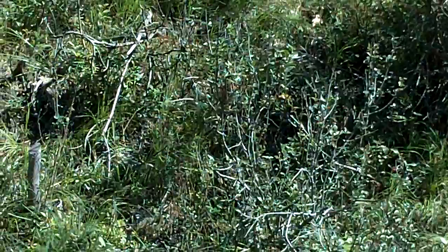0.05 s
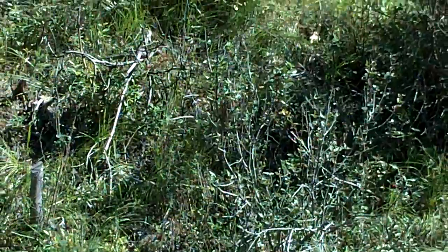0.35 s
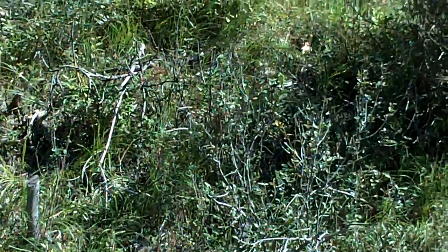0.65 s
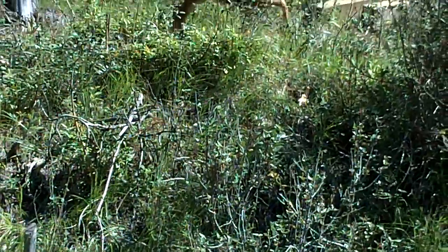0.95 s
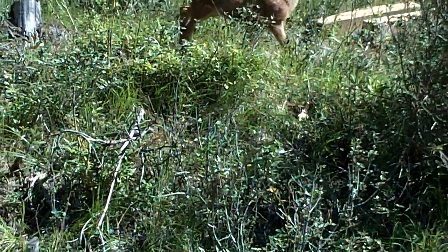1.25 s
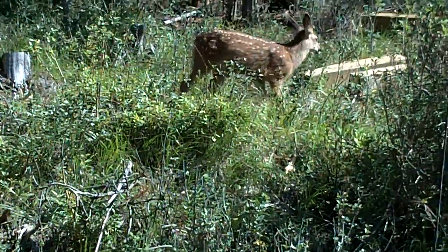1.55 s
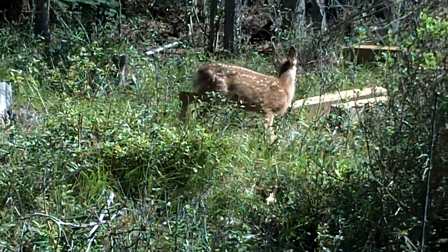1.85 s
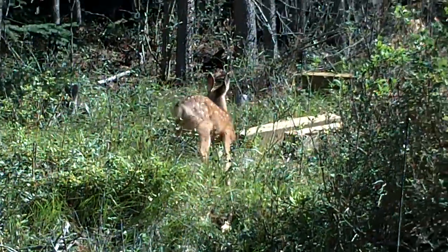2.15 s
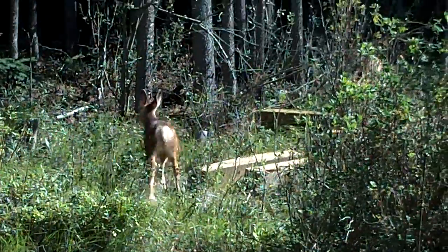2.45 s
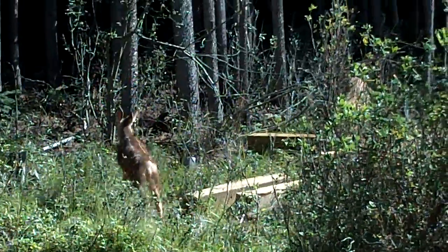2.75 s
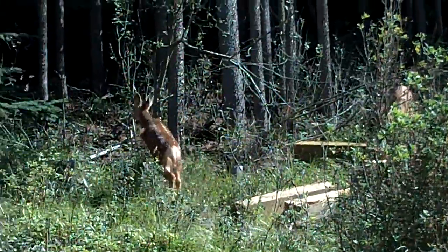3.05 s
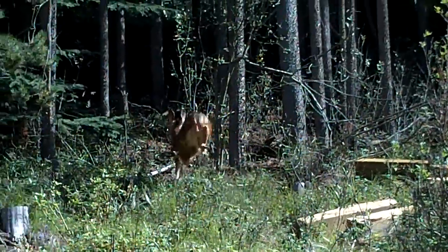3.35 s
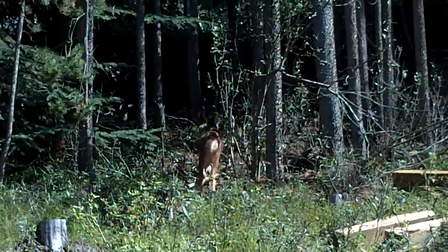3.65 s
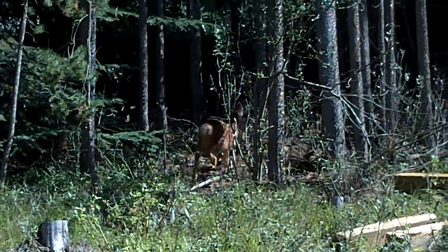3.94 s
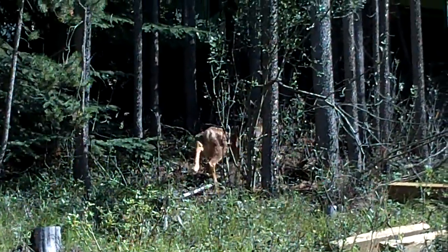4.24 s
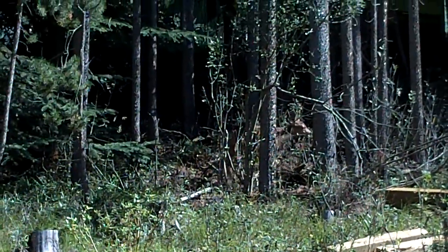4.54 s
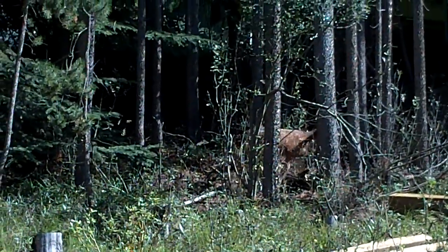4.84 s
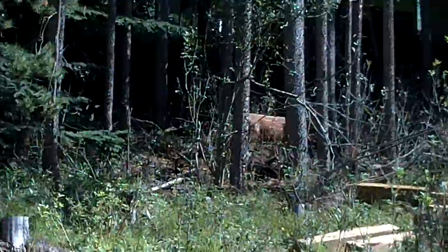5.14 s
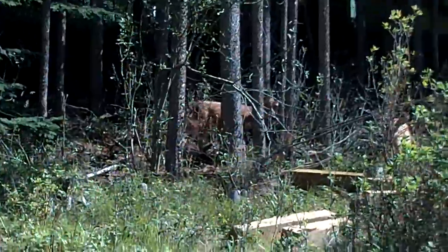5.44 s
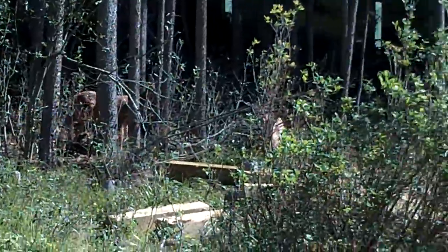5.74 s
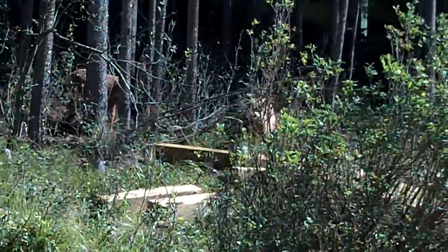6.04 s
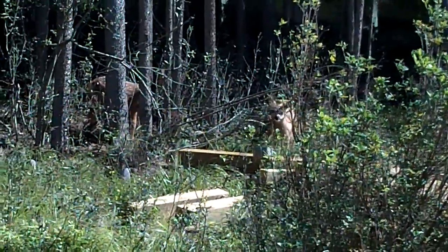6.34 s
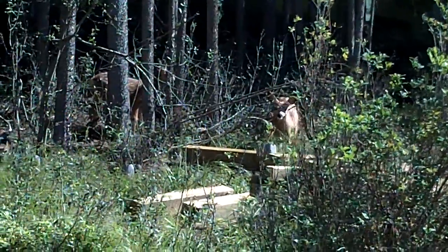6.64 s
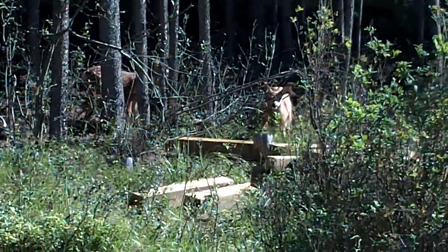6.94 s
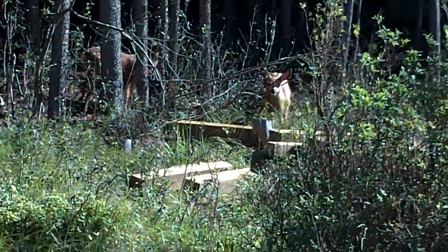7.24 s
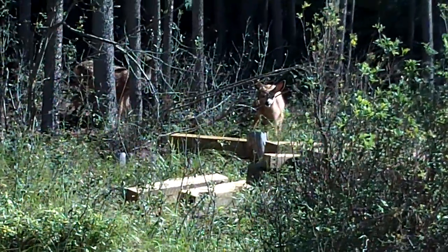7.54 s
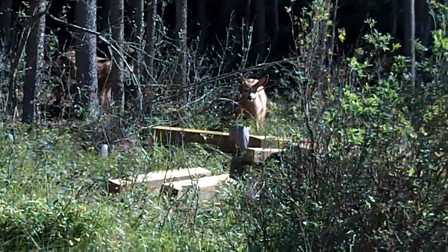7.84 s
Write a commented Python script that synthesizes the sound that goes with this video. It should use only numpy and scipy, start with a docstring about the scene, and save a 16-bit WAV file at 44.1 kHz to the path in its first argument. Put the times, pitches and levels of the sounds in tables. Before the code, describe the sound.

Lumpy wind rumble thumps on the microphone, then eases, with soft forest rustle, a snapping twig and light camera clicks.

```python
"""You hear a low, lumpy rumble of wind on a hand-held camera at a grassy forest edge.
Gusts shed eddies (small swirls of air) at the microphone's opening, and these make the rumble.
Behind it, treetops roar softly, grass and needles hiss, leaves flutter and a far motor hums faintly.
Two twigs snap and the camera body clicks three times under the hand; each rings very briefly."""
import sys
import numpy as np
from scipy import signal
from scipy.fft import rfft, irfft, next_fast_len
from scipy.io import wavfile
from scipy.ndimage import uniform_filter1d

SR = 44100
rng = np.random.default_rng(int(sys.argv[2]) if len(sys.argv) > 2 else 0)


def to_wav(s):
    """Save 16-bit WAV."""
    ch = np.atleast_2d(s).T  # columns
    pcm = np.round(np.clip(ch, -1, 1) * 32767)  # PCM
    wavfile.write(sys.argv[1], SR, pcm.astype(np.int16))


N = 352359
TIME = np.arange(N) / SR

# Gusts, each a flurry of small eddies around a large one: time_s, flurry_db, rise_and_fall_s, thump_db
GUST_EVENTS = [(0.105, -25.5, 0.052, -13.5), (0.438, -18.5, .012, -13), (0.576, -7.5, .012, -17),
               (0.708, -19.5, 0.023, -24), (0.747, -21.5, 0.0081, -15), (0.933, -22, 0.013, -15.5),
               (1.372, -30, 0.071, -15.5), (1.633, -20, 0.013, -12), (1.663, -30, 0.014, -10),
               (1.831, -20, 0.029, -11), (1.994, -22.5, 0.053, -14.5), (2.362, -26, 0.0092, -13),
               (2.494, -14.5, 0.017, -9), (2.629, -12, 0.007, -6.5), (2.706, -13, .02, -7),
               (2.779, -17.5, 0.017, -15.5), (2.854, -25, 0.016, -11.5), (2.938, -18.5, 0.033, -14),
               (3.017, -20, 0.0079, -12.5), (3.087, -20, 0.016, -13.5), (3.341, -22.5, 0.035, -14),
               (3.401, -24, 0.023, -27), (5.516, -25.5, .012, -17.5), (5.639, -30, 0.034, -14.5),
               (6.083, -33, 0.032, -17), (6.28, -29.5, 0.044, -18), (6.447, -31, 0.063, -19.5),
               (7.228, -24, 0.014, -23.5), (7.684, -29, 0.018, -21)]
# Strength of the wind between gusts: time_s, level_db
WIND_STRENGTH = [(0.28, -42), (0.43, -32), (0.6, -32.5), (1.2, -34.5), (1.82, -26), (2.06, -44.5),
                 (2.25, -33.5), (2.68, -26.5), (2.87, -24.5), (3.09, -37), (5.06, -46.5), (6.33, -38.5),
                 (6.67, -46.5), (7.51, -42), (7.98, -38.5)]
# Slow swell of wind pressure on the microphone: time_s, level_db
PRESSURE_SWELL = [(0.08, -28.5), (0.5, -31), (0.87, -23.5), (1.07, -30.5), (2.83, -27), (3.2, -33),
                  (5.05, -37), (5.32, -44.5), (5.6, -23), (5.71, -34), (6.35, -33), (6.39, -41),
                  (6.46, -23), (6.55, -42), (7.21, -35), (7.45, -45.5), (7.85, -32.5), (7.98, -54)]
# Tone of the eddies in a medium gust: pitch_hz, level_db
EDDY_SPECTRUM = [(18, -16), (35, -16.5), (70, -15.5), (120, -17.5), (200, -24), (320, -34.5), (500, -48.5),
                 (800, -73.5), (1400, -87.5)]
# Breeze in the trees: time_s, treetop_roar_db, needle_hiss_db, leaf_flutter_db
BREEZE_LEVELS = [(0.35, -54.5, -61.5, -83), (1.06, -54, -61.5, -81.5), (2.45, -54, -59, -79),
                 (2.6, -53, -58.5, -77), (4.55, -53, -60, -80.5), (6.76, -51.5, -58.5, -77),
                 (7.29, -50.5, -57, -72), (7.9, -50, -58, -73)]
# Tone of the treetops' roar: pitch_hz, level_db
TREETOP_SPECTRUM = [(40, -14.5), (150, 6), (330, 2), (520, -0.5), (720, -5), (1050, -6), (1600, -10.5),
                    (2200, -13.5), (3200, -18.5), (6000, -54.5)]
# Tone of the hiss of grass and needles: pitch_hz, level_db
NEEDLE_SPECTRUM = [(1200, -14), (2400, -12.5), (3000, 0.5), (4200, 5), (4900, 3), (5400, -12.5), (6000, -9),
                   (7200, -16.5), (8500, -19), (10300, -20), (12000, -48)]
# Tone of the fluttering leaves: pitch_hz, level_db
LEAF_SPECTRUM = [(4500, -6.5), (6000, 5.5), (7000, 4.5), (8400, 0), (9700, 3), (10600, 2), (11600, -6),
                 (13500, -17), (16000, -26)]
# Twigs breaking: start_s, level_db, favoured_pitch_hz, falloff_db_per_octave
TWIG_SNAPS = [(1.8061, -21, 4600, 8), (3.9785, -32, 4470, 22)]
# Notes a twig rings at: pitch_hz, level_db, ring_s
TWIG_NOTES = [(1100, -25, 0.0012), (1970, -35, 0.0024), (3400, 5, 0.0062), (4380, 2, 0.0042),
              (4630, 5, 0.0064), (6760, -37, 0.0019), (8600, -23, 0.0018), (11800, -28, .0015)]
# Hand taps on the camera: start_s, level_db, favoured_pitch_hz, falloff_db_per_octave, hardness_db
HAND_TAPS = [(5.9619, -22.5, 1485, 36, -1.5), (6.0475, -24.5, 970, 5, -11), (6.1024, -25, 935, 5, -18)]
# Low notes of the camera's shell: pitch_hz, level_db, ring_s
SHELL_NOTES = [(560, -3, 0.02), (932, -3.5, 0.027), (1460, 8.5, 0.006), (1660, 9, 0.0048),
               (1980, -0.5, 0.012)]
# High notes in the thin tick of a hard contact: pitch_hz, level_db, ring_s
TICK_NOTES = [(4740, -17, 0.016), (6230, -14, 0.0034), (9400, -17, 0.002), (13100, -26, .004)]
# The far motor's two tones: pitch_hz, level_db
MOTOR_TONES = [(263.3, -53), (437, -69.5)]
# How well the air carries the hum: time_s, gain_db
AIR_CARRY = [(0, 1), (3.3, -1.5), (3.9, 3), (4.6, 3), (5.2, -12.5), (5.9, 5.5), (6.9, -9.5), (7.4, 4),
             (7.95, 8)]
# Narrow bands that the camera picks up poorly: pitch_hz, width_hz
CAMERA_DIPS = [(2715, 730), (5500, 450), (7870, 1740), (10930, 930)]


def wind_on_microphone(rumble_dip=0.8, sizzle_db=-37):
    """The rumble dips briefly around each thump, so the thump stands clear; strong gusts sizzle faintly."""
    pressure, nearness = gust_thumps()
    rumble = eddy_rumble() * (1 - rumble_dip * nearness) + pressure
    power = uniform_filter1d(rumble ** 2, size=1500)
    return rumble + from_db(sizzle_db) * power * rng.standard_normal(N)


def eddy_rumble(medium_db=-29, brightening=0.65, max_excess_db=13.5, full_db=-15):
    """Harder gusts shed smaller eddies, so the rumble reaches higher even once its low end is full."""
    swell_db = in_time(PRESSURE_SWELL)[0] + 3.0 * drift(rate_hz=11) - 1.5
    gust_db = gust_strength()
    flurry_db = np.minimum(gust_db, full_db) - 3.5
    excess_db = np.minimum(gust_db - medium_db, max_excess_db)
    edges_hz = 18 * 2 ** np.arange(0, 6.6, 2 / 3)
    out = 0
    for low, high in zip(edges_hz, edges_hz[1:]):
        hz = np.sqrt(low * high)
        eddies = rms_one(band(rng.standard_normal(N + SR), low, high)[SR:])
        # even out the level: eddies follow one another closely, with few long gaps
        power = uniform_filter1d(eddies ** 2, size=4000) + 1e-6
        eddies = rms_one(eddies / power ** 0.25)
        # low bands follow the slow swell, higher ones follow the gusts
        gust_share = np.clip(np.log2(hz / 70), 0, 1)
        level_db = (1 - gust_share) * swell_db + gust_share * flurry_db
        octaves_up = max(np.log2(hz / 150), 0)
        level_db += brightening * octaves_up * excess_db + at_hz(EDDY_SPECTRUM, hz)
        out = out + eddies * np.sqrt(high - low) * from_db(level_db)
    return out


def gust_strength(calm_db=-2.5, wind_lumps_db=4.0, gust_lumps_db=2.74):
    """Buffeting in dB: gusts swell out of the lumpy wind and die back; calm air sheds fewer eddies."""
    wind_db, = in_time(WIND_STRENGTH)
    calm = (wind_db.max() - wind_db) / np.ptp(wind_db)
    lumps = drift(rate_hz=22)
    between_gusts = from_db(wind_db + calm_db * calm ** 2 + wind_lumps_db * lumps)
    gust_power = sum((from_db(db) * np.exp(-np.minimum(np.abs(TIME - time_s) / fade_s, 20))) ** 2
                     for time_s, db, fade_s, _ in GUST_EVENTS)
    return 10 * np.log10(between_gusts ** 2 + gust_power * from_db(gust_lumps_db * lumps) ** 2)


def gust_thumps(medium_hz=117, medium_db=-23.5, octaves_per_db=0.0438):
    """A large eddy passes as a push between two weaker pulls, higher in pitch in a stronger gust."""
    pressure, nearness = np.zeros(N), np.zeros(N)
    for time_s, flurry_db, _, thump_db in GUST_EVENTS:
        hz = medium_hz * 2 ** (octaves_per_db * (flurry_db - medium_db))
        span = np.abs(TIME - time_s) < .04
        spread = (np.pi * hz * (TIME[span] - time_s)) ** 2
        pressure[span] += from_db(thump_db) * (1 - 2 * spread) * np.exp(-spread)
        nearness[span] += np.exp(-spread / 10)  # how near each thump is in time
    return pressure, np.clip(nearness, 0, 1)


def trees(flutter_db=4.0, flutter_hz=24):
    """Far treetops roar and needles hiss smoothly; near leaves flutter in small patches."""
    roar_db, hiss_db, leaf_db = in_time(BREEZE_LEVELS)
    rustle = noise(LEAF_SPECTRUM)
    shared_flutter = 0.5 * drift(flutter_hz)
    edges_hz = np.geomspace(4500, 16000, 9)
    leaves = 0
    for k, (low, high) in enumerate(zip(edges_hz, edges_hz[1:])):
        patch = band(np.roll(rustle, k * SR // 2), low, high)
        leaves = leaves + patch * from_db(flutter_db * (drift(flutter_hz) + shared_flutter))
    roar = from_db(roar_db + 9) * noise(TREETOP_SPECTRUM)
    hiss = from_db(hiss_db + 1) * noise(NEEDLE_SPECTRUM)
    return roar + hiss + from_db(leaf_db + 8) * rms_one(leaves)


def twig_snaps():
    """A sharp break sets the wood ringing for a moment."""
    return strikes(TWIG_SNAPS, TWIG_NOTES, crackle=0.1, crackle_s=0.0012)


def camera_clicks():
    """The hand knocks the camera's shell; a harder contact adds a louder thin tick."""
    knocks = strikes([tap[:4] for tap in HAND_TAPS], SHELL_NOTES, crackle=0.06, crackle_s=0.0029)
    contacts = [(start_s, db + hardness_db, hz, 0) for start_s, db, hz, _, hardness_db in HAND_TAPS]
    return knocks + strikes(contacts, TICK_NOTES, crackle=0.16, crackle_s=0.0044)


def far_motor(waver=0.00313, fading_db=2.0):
    """Two humming tones waver and fade as the air moves."""
    wavering_time = np.cumsum(1 + waver * drift(rate_hz=2.65)) / SR
    carry_db, = in_time(AIR_CARRY)
    hum = 0
    for hz, db in MOTOR_TONES:
        gain = np.sqrt(2) * from_db(db + carry_db + fading_db * drift(rate_hz=2.2))
        hum = hum + gain * np.sin(2 * np.pi * hz * wavering_time)
    return hum


def strikes(events, notes, crackle, crackle_s):
    """A click and a short crackle ring an object's notes; falloff weakens those far from one pitch."""
    out, t = np.zeros(N), TIME[:SR // 10]
    for start_s, db, favoured_hz, falloff in events:
        push = crackle * rng.standard_normal(len(t)) * np.exp(-t / crackle_s)
        push[0] += 1
        sound = 0
        for k, (hz, note_db, ring_s) in enumerate(notes):
            gain = from_db(db + note_db - falloff * abs(np.log2(hz / favoured_hz)))
            sound = sound + gain * (-1) ** k * ring(push, hz, ring_s)
        start = round(start_s * SR)
        out[start:start + len(t)] += sound[:N - start]
    return out


def ring(push, hz, ring_s):
    """A push starts a pure tone that dies away by 60 dB in ring_s."""
    decay = from_db(-60 / (ring_s * SR))
    angle = 2 * np.pi * hz / SR
    return signal.lfilter([0, np.sin(angle)], [1, -2 * decay * np.cos(angle), decay * decay], push)


def drift(rate_hz):
    """Smooth random wandering, typically about 1 either side of zero."""
    step, warm_up = 40, 2000  # one point every 40 samples; the first points are skipped
    decay = np.exp(-2 * np.pi * rate_hz * step / SR)
    jitter = rng.standard_normal(N // step + warm_up + 2)
    slow = signal.lfilter([1], [1, -2 * decay, decay * decay], jitter)[warm_up:]
    return np.interp(np.arange(N) / step, np.arange(len(slow)), rms_one(slow))


def noise(spectrum):
    """Steady noise with the given tone and an average power of 1."""
    size = next_fast_len(N)
    white = rfft(rng.standard_normal(size))
    gain = from_db(at_hz(spectrum, np.arange(len(white)) * SR / size))
    return rms_one(irfft(white * gain, size)[:N])


def band(x, low_hz, high_hz):
    """Keep the sound between two pitches."""
    return signal.sosfilt(signal.butter(3, [low_hz, high_hz], "band", fs=SR, output="sos"), x)


def at_hz(spectrum, hz):
    """Look up a spectrum's level in dB at any pitch."""
    pitches, db = np.transpose(spectrum)
    return np.interp(np.log(np.maximum(hz, 1)), np.log(pitches), db)


def in_time(rows):
    """Join a table's timed points into one curve for each level column."""
    times, *columns = np.transpose(rows)
    return [np.interp(TIME, times, column) for column in columns]


def rms_one(x):
    """Scale to an average power of 1."""
    return x / np.sqrt(np.mean(x ** 2) + 1e-20)


def from_db(db):
    """Turn decibels into a multiplier."""
    return 10 ** (np.asarray(db) / 20)


def scene():
    """Wind at the microphone in front of the forest, in one channel."""
    snaps_and_clicks = twig_snaps() + camera_clicks()
    return (wind_on_microphone() + trees() + snaps_and_clicks + far_motor())[None]


def record(dry, hiss_db=-73.0, start_s=0.067, fade_in_s=0.011, cutoff_hz=15250):
    """The camera adds its own hiss, dips four narrow bands, fades in quickly and cuts the top treble."""
    x = dry + from_db(hiss_db) * rng.standard_normal(dry.shape)
    for hz, width_hz in CAMERA_DIPS:
        x = signal.lfilter(*signal.iirnotch(hz, hz / width_hz, fs=SR), x)
    x = x * np.clip((TIME - start_s) / fade_in_s, 0, 1)
    return signal.sosfilt(signal.ellip(12, .1, 90, cutoff_hz, fs=SR, output="sos"), x)


dry = scene()
out = record(dry)
to_wav(out)
```